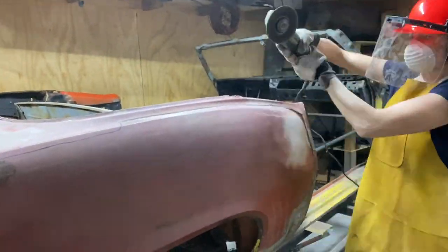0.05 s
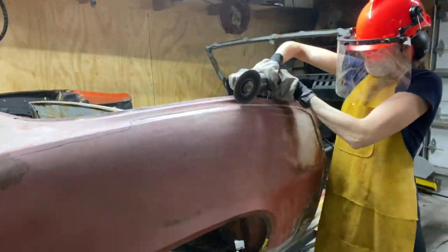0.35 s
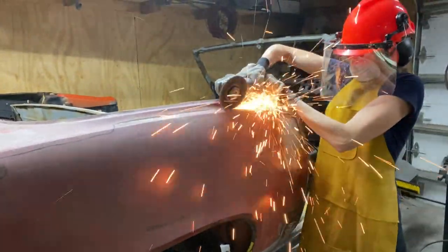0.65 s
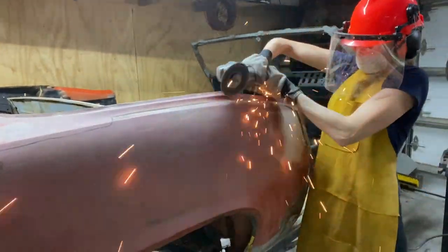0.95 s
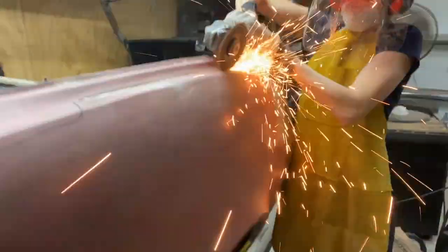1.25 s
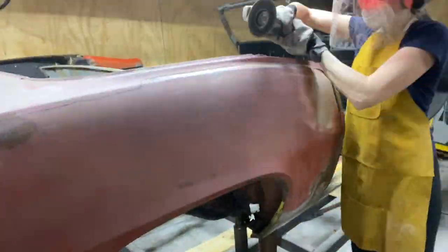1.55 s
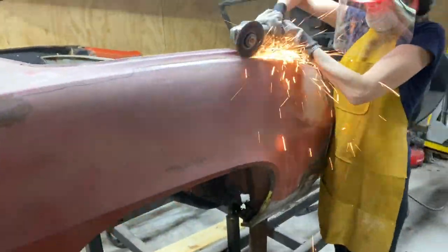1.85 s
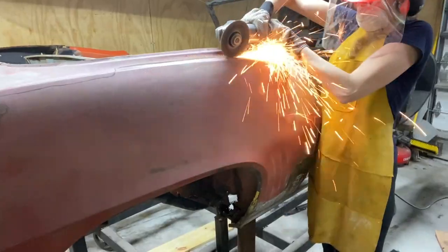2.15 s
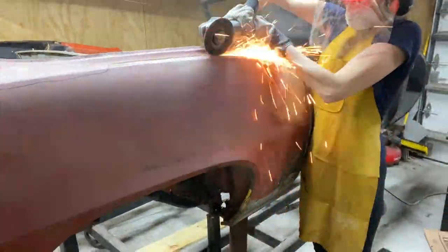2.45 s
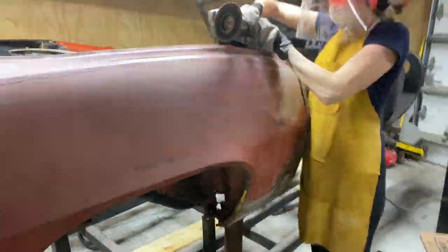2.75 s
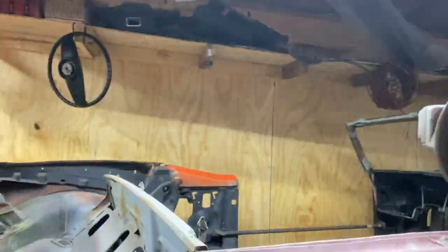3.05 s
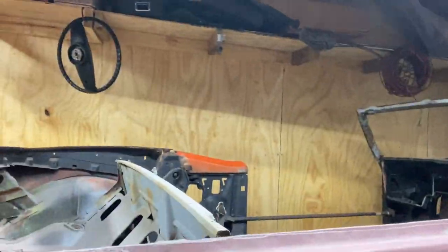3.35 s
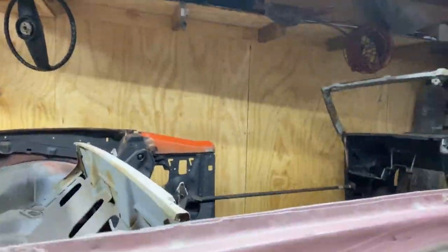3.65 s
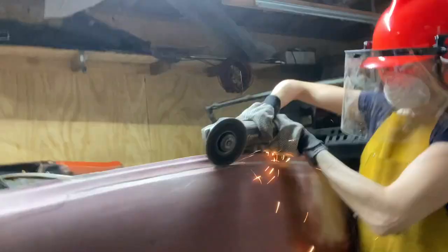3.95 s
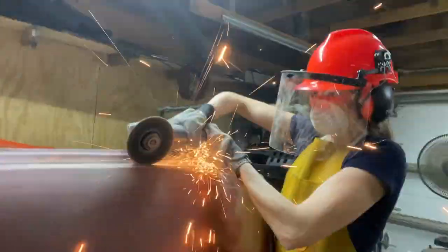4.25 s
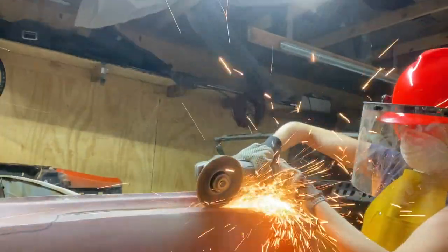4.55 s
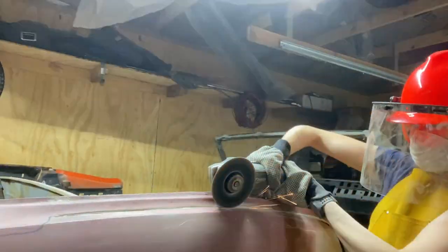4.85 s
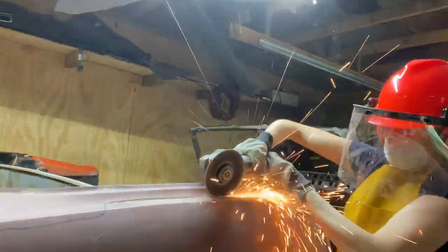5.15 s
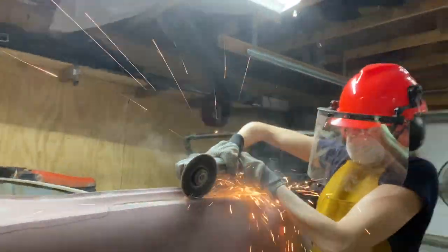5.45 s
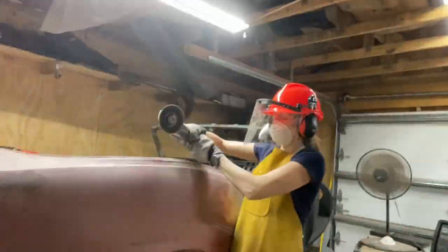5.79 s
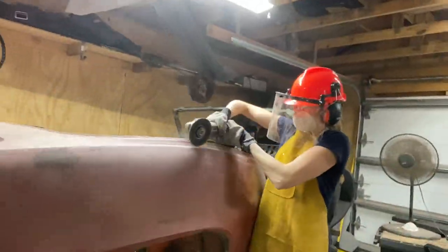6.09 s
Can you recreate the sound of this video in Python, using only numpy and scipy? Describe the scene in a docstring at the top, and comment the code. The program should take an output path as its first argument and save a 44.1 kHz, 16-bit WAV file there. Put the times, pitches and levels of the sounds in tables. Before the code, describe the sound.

An angle grinder is already running, with a high whine and hissing air, a metre or two from a hand-held phone in a garage with a short echo. It cuts into a steel car panel from about 0.4 to 0.9 seconds, briefly from 1.1 to 1.4, and again from 1.7 to 2.6. Each time the motor drops in pitch, grit scrapes, sparks hiss, the panel rings and the disc chatters and squeals; the whine climbs back as it lifts. The tool then spins freely, with faint finger bumps on the phone near 2.9 seconds and a quick cluster of sharper knocks and tiny squeaks around 3.5. Two more cuts follow, from 4.0 to 4.8 and from 4.9 to 5.7, the last slowing the motor most and adding a rough metallic howl. The grinder returns to its free whine until the end, just after 6 seconds.

```python
"""Angle grinder cutting a car wing

An angle grinder makes five cuts in a steel car wing in a garage, a metre or two from a hand-held phone.
Running free, it whines and its fan rushes. When the disc bites, the motor slows, grit scrapes and rings
the panel, sparks hiss, and the disc chatters and squeals in step with the shaft. Fingers bump the phone."""
import sys
import numpy as np
from scipy import signal
from scipy.fft import rfft, irfft
from scipy.io import wavfile

SR = 44100
rng = np.random.default_rng(int(sys.argv[2]) if len(sys.argv) > 2 else 0)


def bounce(signal):
    """Save signal as a 16-bit WAV file at the path given by the first command-line argument."""
    frames = np.transpose(np.atleast_2d(signal))
    limited = np.clip(frames, -1, 1)
    pcm = np.round(limited * 32767).astype(np.int16)
    wavfile.write(sys.argv[1], SR, pcm)


N = 269892
TIME = np.arange(N) / SR
FREQ = np.maximum(np.fft.rfftfreq(N, 1 / SR), 1)
IDLE_HZ = 135.8  # shaft turns per second when running free
CUT_ATTACK_S, ATTACK_S, RELEASE_S = 0.086, 0.016, 0.017  # cuts ease in; digs and squeals start faster
# the disc in the steel: (start [s], end [s], scrape level [dB], spark level [dB])
CUTS = [(0.392, 0.949, -45.5, -39.5), (1.133, 1.427, -51, -46.5), (1.72, 2.642, -43.5, -38.5),
        (3.962, 4.788, -49.5, -37.5), (4.918, 5.716, -50, -35)]


def undb(db):
    """Turn decibels into a gain to multiply by."""
    return 10 ** (np.asarray(db) / 20)


def unit(x):
    """Scale a signal to an average strength (rms) of 1."""
    return x / np.sqrt(np.mean(np.abs(x) ** 2))


def curves(table):
    """Join rows of (time, values...) into one curve per value."""
    times, *columns = np.transpose(table)
    return [np.interp(TIME, times, column) for column in columns]


def since(moment_s):
    """Seconds gone by after a moment; zero before it."""
    return np.maximum(TIME - moment_s, 0)


def contact(start, end, attack_s=ATTACK_S):
    """One touch: rise from 0 to 1, hold, then die away."""
    return np.minimum(since(start) / attack_s, 1) * np.exp(-np.minimum(since(end) / RELEASE_S, 20))


def held(table, column):
    """Hold each row's value from its start to its end; overlapping rows add up."""
    return sum(row[column] * contact(*row[:2]) for row in table)


def sounding(table, column, attack_s=ATTACK_S):
    """Gain over time from a column of decibels; silent between events."""
    return sum(undb(row[column]) * contact(*row[:2], attack_s) for row in table)


def wander(rate):
    """A smooth random curve of strength 1 that changes about `rate` times a second."""
    steps = np.arange(0, TIME[-1] + 1, 1 / (12 * rate))
    slow = signal.sosfilt(signal.butter(3, 1 / 7, output="sos"), rng.standard_normal(len(steps)))
    return unit(np.interp(TIME + 1, steps, slow))


def grains(spread_db, side_db):
    """Noise of many tiny, uneven impacts; more side_db makes the ears less alike."""
    mid, side = rng.standard_normal((2, N)) * undb(spread_db * rng.standard_normal((2, N)))
    return unit(mid + undb(side_db) * side * np.array([[1], [-1]]))


def colour(x, points):
    """Shape bass and treble along (frequency [Hz], level [dB]) points; strength 1."""
    hz, db = np.transpose(points)
    return unit(irfft(rfft(x) * undb(np.interp(np.log(FREQ), np.log(hz), db)), N))


def resonate(x, modes):
    """Ring an object's modes, its natural notes: (pitch [Hz], width [Hz], level [dB])."""
    response = sum(undb(db) / (1 + 1j * (FREQ ** 2 - hz ** 2) / (FREQ * width))
                   for hz, width, db in modes)
    return irfft(rfft(x) * response, N)


def ring_on(x, t60_s):
    """A tail as strong as the sound, different in each ear, that falls 60 dB in t60_s."""
    t = TIME[:SR // 2]
    tail = rng.standard_normal((2, len(t))) * undb(-60 * t / t60_s) * (t > .004)
    tail /= np.sqrt(np.sum(tail ** 2, axis=1, keepdims=True))
    return signal.fftconvolve(x, tail, axes=1)[:, :N]


def pan(db):
    """Left and right gains that make the left louder by db."""
    gains = undb(np.array([db, -db]).reshape(2, -1) / 2)
    return gains / np.sqrt(np.mean(gains ** 2, axis=0))


def tone(angle, order, rough, width_hz, apart, rasp=0):
    """A tone of `order` cycles a turn; uneven contact smears it and grit makes it rasp."""
    smear = rough * (wander(width_hz) + 1j * wander(width_hz))
    if rasp:
        smear += rasp * (wander(220) + 1j * wander(220))
    ear_fading = apart * (0.56 * wander(11.4) + 1j * wander(5.3)) * np.array([[1], [-1]])
    return unit(np.real((1 + smear + ear_fading) * np.exp(1j * order * angle)))


def glides(rows, rough):
    """Short sliding tones with a shaky pitch."""
    out = np.zeros(N)
    for start_s, length_s, start_hz, end_hz, db in rows:
        start, size = int(start_s * SR), int(length_s * SR)
        hz = np.linspace(start_hz, end_hz, size) * (1 + rough * wander(350)[:size])
        wave = np.sin(2 * np.pi * np.cumsum(hz) / SR)
        out[start:start + size] += undb(db) * signal.windows.tukey(size) * wave
    return out


def shaft_speed(load):
    """The shaft slows in every cut and wobbles a little, more so while cutting."""
    # the shaft sags as the disc bites and recovers as it lifts: (time [s], speed [turns/s])
    speeds = [(0.38, 135.8), (0.5, 131.3), (0.58, 125.1), (0.64, 123.6), (0.68, 120.0), (0.76, 122.0),
              (0.82, 117.0), (0.92, 117.0), (0.97, 121.0), (1.02, 131.6), (1.04, 133.3), (1.12, 135.8),
              (1.18, 135.8), (1.22, 132.3), (1.275, 123.2), (1.305, 121.4), (1.38, 128.4), (1.44, 125.9),
              (1.52, 133.9), (1.6, 135.8), (1.72, 135.8), (1.79, 133.5), (1.83, 127.6), (1.94, 124.2),
              (2.02, 118.7), (2.15, 122.2), (2.22, 115.7), (2.28, 116.2), (2.34, 113.1), (2.42, 114.5),
              (2.49, 113.7), (2.59, 115.4), (2.63, 112.7), (2.67, 116.0), (2.75, 131.8), (2.87, 135.8),
              (3.95, 135.8), (4.15, 125.1), (4.28, 123.0), (4.4, 118.2), (4.45, 118.3), (4.61, 116.6),
              (4.75, 116.3), (4.79, 118.2), (4.87, 131.8), (4.93, 134.2), (4.97, 128.9), (5.07, 118.4),
              (5.13, 116.6), (5.21, 111.4), (5.29, 113.2), (5.37, 109.1), (5.43, 108.5), (5.47, 110.2),
              (5.61, 106.0), (5.73, 113.2), (5.775, 127.0), (5.81, 132.5), (5.91, 135.8)]
    speed_hz, = curves(speeds)
    return speed_hz * (1 + (0.00046 + 0.0012 * load) * wander(17.12))


def motor(angle, speed_hz, load, hiss_db, gear_db, whistle_db):
    """The motor whines and whistles, the gear teeth sing and the shaft adds faint tones."""
    # the whine swells: (start [s], end [s], extra level [dB], extra level of its octave [dB])
    swells = [(0.48, 0.8, 4, -4), (1.21, 1.41, 10, -10), (1.76, 1.95, 10, 0), (3.12, 3.53, 7, -2),
              (3.95, 4.78, 1, -9), (4.845, 4.925, 15.5, 3.5), (5.18, 5.55, 3, 9), (5.565, 5.655, 22.5, 1),
              (5.77, 5.82, 11.5, -4)]
    # the ringing of the housing's air vents: (pitch [Hz], width [Hz], relative level [dB])
    vents = [(6710, 100, 11), (6700, 320, -10)]
    # faint running tones, in two matching lists: (pitch [cycles/turn]) and (relative level [dB])
    faint_orders = [3.2, 4.1, 6.2, 15, 20, 30, 49]
    faint_levels = [-15, -18, -13, -11, -24, -30, -8]
    whine = tone(angle, order=10, rough=0.21, width_hz=16, apart=0.39)
    octave = tone(angle, order=20, rough=0.4, width_hz=39, apart=0.38)
    whine += undb(-9.5 + held(swells, column=3)) * octave
    gear = tone(angle, order=39, rough=0.24, width_hz=40, apart=0.35, rasp=0.28)
    whistle = tone(angle, order=50, rough=0.3, width_hz=41, apart=0.51, rasp=0.27)
    # near full speed the whistle meets the vents' own note and turns airy
    in_tune = np.exp(-((speed_hz - IDLE_HZ) / 3) ** 2)
    whistle += undb(-3.5) * in_tune * unit(resonate(grains(spread_db=-1, side_db=-1), vents))
    faint = sum(undb(db) * tone(angle, order, rough=0.84, width_hz=24, apart=1)
                for order, db in zip(faint_orders, faint_levels))
    # cutting strengthens the whine; gears and whistle sing out near full speed
    free = np.exp(-((speed_hz - IDLE_HZ) / 5) ** 2)
    whine *= undb(hiss_db - 27 + 4 * load + held(swells, column=2))
    gear *= undb(gear_db - 15 * (1 - free))
    whistle *= free ** 2 * undb(whistle_db) + load * undb(-67.5)
    return whine + gear + whistle + undb(hiss_db - 24) * faint


def fan(angle, hiss_db):
    """Air torn by the fan and the disc's rim, pulsing a little on every turn."""
    # the air's high hiss and lower rush: (frequency [Hz], relative level [dB])
    hiss_colour = [(3000, -26.5), (4500, -8), (6000, -2.5), (7000, 1.5), (9000, 1), (12000, 1.5),
                   (14000, 4), (15800, 6)]
    rush_colour = [(25, -2.5), (100, -6.5), (220, -6.5), (450, -3.5), (700, -5), (1100, -4.5), (1500, -0.5),
                   (2200, -1.5), (3300, 0.5), (4300, -1), (6000, -4), (9000, -51)]
    hiss = colour(grains(spread_db=1, side_db=-13), hiss_colour) * undb(hiss_db + wander(22))
    rush = colour(grains(spread_db=2.5, side_db=-2), rush_colour)
    rush *= undb(hiss_db - 15.5 + 0.93 * wander(17))
    return (hiss + rush) * (1 + 0.028 * np.cos(angle))


def cutting(angle, speed_hz, load):
    """Grit tears the steel, hardest once a turn, throwing sparks and shaking the panel."""
    # the disc digs in or eases off: (start [s], end [s], extra grit [dB], extra chatter [dB])
    digs = [(0.62, 0.72, 1, 6), (0.778, 0.94, 0.5, 4), (1.19, 1.275, 5, 8.5), (1.93, 2.06, 0.5, 6),
            (2.179, 2.642, -2.5, 2), (2.19, 2.363, 1.5, 4.5), (4.2, 4.6, 0.5, 5.5), (4.71, 4.8, -1, -2),
            (5.16, 5.72, -0.5, -2), (5.525, 5.632, 0.5, 3.5), (5.66, 5.72, -0.5, -1)]
    # grit scraping steel: (frequency [Hz], relative level [dB])
    scrape_colour = [(25, -1), (90, -5.5), (250, -2.5), (600, -1.5), (800, -3), (1100, -4), (1500, -13),
                     (1750, -6), (2200, -7), (2800, 2.5), (3400, -3), (4200, 0), (5000, -1.5), (9000, -14)]
    pressure = undb(held(digs, column=2))
    scrape_gain = pressure * sounding(CUTS, column=2, attack_s=CUT_ATTACK_S)
    spark_gain = pressure * sounding(CUTS, column=3, attack_s=CUT_ATTACK_S)
    chatter_gain = load * undb(-53.5 + held(digs, column=3))
    moved = np.interp(TIME, (3, 4), (0, 1))  # the disc moves to a second spot between 3 and 4 s
    bite = unit(undb(0.68 * np.cos(angle) + 2 * wander(15.6) + wander(330)))
    scrape = colour(bite * grains(spread_db=6, side_db=-0.5), scrape_colour) * scrape_gain
    sparks = spark_hiss(speed_hz, moved) * spark_gain
    chatter = chattering(angle) * chatter_gain
    shake = bite * grains(spread_db=6.5, side_db=-11.5) * (undb(10.5) * scrape_gain + chatter_gain)
    shake += undb(-14) * chatter  # the panel sings out when a chatter tone slides across a mode
    ringing = thin_sheet(bite, scrape_gain) + panel(shake, moved)
    return scrape + sparks + ringing + howling() + bite * chatter + squealing(angle)


def spark_hiss(speed_hz, moved):
    """A flickering spray of hot grit, duller when the disc slows and at the second spot."""
    # the hiss of the sparks: (frequency [Hz], relative level [dB])
    spark_colour = [(3000, -28), (4300, -0.5), (4900, 9), (6200, 4.5), (7500, 9), (9000, 5.5), (10500, 6),
                    (12800, -1.5), (14500, 3.5), (15800, 6.5)]
    treble_hz = 10500
    hiss = colour(grains(spread_db=0, side_db=1), spark_colour)
    treble = irfft(rfft(hiss) / (1 + (treble_hz / FREQ) ** 10), N)
    treble_db = 0.61 * (speed_hz - 115) - 8.5 * moved
    return (hiss - treble + treble * undb(treble_db)) * undb(2.04 * wander(100))


def chattering(angle):
    """The disc rattles in the slot in step with the shaft; higher tones are grittier."""
    # chatter tones, in two matching lists: (pitch [cycles/turn]) and (relative level [dB])
    orders = [12, 18, 20, 28, 30, 40, 50, 60, 70, 80, 90, 100, 110, 120, 130]
    levels = [-13, -21.5, -10, -9.5, -8, -3, -5, -3.5, -1, -2, -5, -2, -1, -2, 3]
    return sum(undb(db) * tone(angle, order, rough=0.53, width_hz=36, apart=1, rasp=order / 110)
               for order, db in zip(orders, levels))


def thin_sheet(bite, scrape_gain):
    """Grit stirs the thin sheet's many close modes, which blur into one ringing tail."""
    # the band those modes fill: (frequency [Hz], relative level [dB])
    band = [(700, -14), (1150, -10), (1450, -7), (2400, -1), (3100, -2), (3900, -22)]
    grit = colour(bite * grains(spread_db=4, side_db=-6), band) * scrape_gain
    return ring_on(grit, t60_s=0.23) * undb(-4)


def panel(shake, moved):
    """The slit steel rings; each mode swells and fades as the contact creeps over it."""
    # the panel's modes: (pitch [Hz], width [Hz], gain at first spot [dB], gain at second spot [dB])
    modes = [(110, 60, -7.5, -6), (660, 23, -5.5, -21), (962.6, 14, 7, 3.5), (1227, 17, -0.5, -15),
             (1450, 56, -1, 1), (1530, 43, 6.5, 5.5), (1917, 57, 4, 1), (2112, 32, 4, -6),
             (2204, 42, -5, 2), (2282, 40, -2, 4), (2494, 34, -5.5, 7), (2695, 51, 3, 5.5),
             (2805, 50, 2.5, -3), (2888, 41, -18, 9.5), (3160, 57, 0.5, 7.5), (3516, 90, -3.5, 5),
             (3795, 97, -4.5, -3), (4940, 63, 0.5, 7), (6030, 240, 1, -11)]
    out = 0
    for hz, width, first_db, second_db in modes:
        level_db = first_db + (second_db - first_db) * moved + 1.35 * wander(6)
        out += resonate(shake, [(hz, width, 0)]) * undb(level_db)
    return out


def squealing(angle):
    """The disc squeals in the slot: rough tones locked to the shaft's speed."""
    # the disc's squeals: (start [s], end [s], pitch [cycles/turn], level [dB])
    squeals = [(0.46, 0.92, 40, -53.5), (0.5, 0.78, 20, -65), (0.623, 0.86, 50, -44),
               (0.78, 0.904, 20, -45.5), (0.788, 0.92, 30, -49), (1.19, 1.273, 50, -48),
               (1.193, 1.233, 45, -44), (1.2, 1.226, 40, -46), (1.22, 1.33, 20, -51),
               (1.239, 1.28, 30, -42.5), (1.315, 1.334, 30, -52), (1.317, 1.406, 15, -53.5),
               (1.847, 2.196, 50, -43.5), (1.955, 2.303, 20, -56), (2.17, 2.62, 30, -51),
               (2.306, 2.65, 20, -48.5), (2.498, 2.624, 20, -50), (2.514, 2.61, 50, -50.5),
               (4.062, 4.136, 50, -43), (4.127, 4.335, 40, -41.5), (4.214, 4.307, 40, -40.5),
               (4.217, 4.548, 50, -54), (4.38, 4.563, 40, -39.5), (4.572, 4.718, 40, -52),
               (4.352, 4.705, 60, -46.5), (4.098, 4.6, 90, -53), (4.993, 5.04, 40, -38),
               (5.063, 5.64, 40, -45.5), (5.553, 5.628, 40, -51.5), (5.158, 5.33, 50, -45.5),
               (5.483, 5.62, 50, -42), (5.15, 5.69, 80, -45), (5.558, 5.632, 30, -48.5),
               (5.54, 5.648, 20, -43), (5.687, 5.718, 20, -42), (5.7, 5.725, 40, -47)]
    out = 0
    for order in sorted({row[2] for row in squeals}):
        gain = sounding([row for row in squeals if row[2] == order], column=3)
        out += gain * tone(angle, order, rough=0.31, width_hz=40, apart=0.28, rasp=0.3)
    return out * pan(8.6)


def howling():
    """Grit rings the slot's edges; each howl mixes a steady note with a rasp at the same pitch."""
    # the edges howl: (start [s], end [s], pitch [Hz], width [Hz], level [dB], purity [0-1])
    howls = [(0.79, 0.948, 2120, 40, -47.5, 0.54), (2.18, 2.645, 2082, 27, -49, 0.4),
             (5.162, 5.69, 2075, 30, -46.5, 0.75), (5.537, 5.725, 2190, 220, -46, 0.3),
             (5.172, 5.625, 4970, 300, -43.5, 0.04), (5.46, 5.632, 5400, 254, -47, 0.2)]
    grit = grains(spread_db=6, side_db=-9)
    out = 0
    for start, end, hz, width, db, purity in howls:
        note = tone(2 * np.pi * hz * TIME, order=1, rough=0.2, width_hz=25, apart=0.14)
        rasp = unit(resonate(grit, [(hz, width, 0)]))
        out += undb(db) * contact(start, end) * (np.sqrt(purity) * note + np.sqrt(1 - purity) * rasp)
    return out


def handling():
    """A finger sticks and slips on the phone; each slip knocks and rubs, and fast slips squeak."""
    # finger bumps: (time [s], relative level [dB])
    bumps = [(1.111, -47), (2.838, -42.5), (2.881, -46), (2.899, -49), (2.936, -41.5), (3.469, -32),
             (3.483, -29), (3.491, -22.5), (3.501, -25), (3.513, -25.5), (3.522, -27), (3.526, -32),
             (3.534, -26.5), (3.542, -46), (3.559, -35), (3.574, -43)]
    # the ringing of the phone's case: (pitch [Hz], width [Hz], relative level [dB])
    case_modes = [(410, 90, -6.5), (510, 152, 4.5), (685, 100, -1), (1080, 780, -11.5), (2000, 3500, -14.5),
                  (6660, 740, -14)]
    # finger squeaks: (time [s], length [s], start pitch [Hz], end pitch [Hz], level [dB])
    squeaks = [(3.446, 0.036, 2150, 3280, -45), (3.455, 0.016, 1260, 1650, -44),
               (3.485, 0.016, 1670, 1940, -37.5), (3.487, 0.017, 6900, 7570, -33),
               (3.499, 0.009, 7400, 6200, -27), (3.51, 0.011, 7260, 5860, -33),
               (3.612, 0.016, 7100, 6500, -43), (5.83, 0.03, 4503, 2786, -50.5)]
    knocks, rub = np.zeros((2, N))
    for start_s, db in bumps:
        start = int(start_s * SR)
        knocks[start] += undb(db)
        rub[start:] += undb(db) * np.exp(-TIME[:N - start] / 0.0088)
    # soft skin rounds each knock; the small case carries no bass
    knocks = signal.sosfilt(signal.butter(2, 1800, fs=SR, output="sos"), knocks)
    case = resonate(knocks + 0.06 * rub * grains(spread_db=4.5, side_db=-8), case_modes)
    case = signal.sosfilt(signal.butter(4, 275, "high", fs=SR, output="sos"), case)
    return (undb(26.5) * case + glides(squeaks, rough=0.018)) * pan(3)


def falling_zips():
    """Faint tones slide down as the last two cuts end."""
    # the zips: (time [s], length [s], start pitch [Hz], end pitch [Hz])
    zips = [(4.759, 0.071, 984, 68.9), (5.639, 0.04, 910, 100), (5.656, 0.059, 1096, 414)]
    level_db = -55
    return glides([(*row, level_db) for row in zips], rough=0.1)


def garage(x):
    """Close plywood walls add a short echo."""
    echo_gain = undb(-5.5)
    return (x + echo_gain * ring_on(x, t60_s=0.076)) / np.sqrt(1 + echo_gain ** 2)


def microphones(x, pan_db):
    """The microphone nearer the tool hears it louder and a moment sooner."""
    lead_s = 6e-6 * pan_db
    fine = signal.resample_poly(x, 4, 1, axis=1)  # finer time steps allow tiny delays
    fine_time = np.arange(4 * N) / (4 * SR)
    left = np.interp(TIME + lead_s, fine_time, fine[0])
    right = np.interp(TIME - lead_s, fine_time, fine[1])
    return np.array([left, right]) * pan(pan_db)


def scene():
    """One turning shaft drives the whine, chatter and squeals; the hiss follows its speed."""
    # how the free-running tool is heard as it and the phone move:
    # (time [s], hiss [dB], gears [dB], whistle [dB], left minus right [dB])
    tool_levels = [(0.1, -38, -51.5, -49, 0.5), (1.1, -37.5, -50, -59, 1), (1.55, -39, -50.5, -56, 0.5),
                   (2.88, -37, -48, -48.5, 1), (2.98, -32, -68, -41, -0.5), (3.12, -33, -76, -41, -1.5),
                   (3.22, -32.5, -76, -51, -2), (3.58, -35, -73, -58, -2), (3.74, -35, -80, -49, -1),
                   (3.81, -37.5, -57, -49, 1), (4.88, -32, -65, -71, 2), (5.8, -38.5, -64, -49, 1.5),
                   (5.97, -40.5, -61, -49.5, 2), (6.1, -39, -58, -58, 1.5)]
    hiss_db, gear_db, whistle_db, pan_db = curves(tool_levels)
    load = sum(contact(start, end, CUT_ATTACK_S) for start, end, *_ in CUTS)  # 0 free, 1 cutting
    speed_hz = shaft_speed(load)
    angle = 2 * np.pi * np.cumsum(speed_hz) / SR
    # the hiss is quieter at low speed and dips briefly after each cut
    hiss_db_per_hz, dip_db, dip_s = 0.11, -4.5, 0.096
    dip = sum((TIME > end) * np.exp(-since(end) / dip_s) for _, end, *_ in CUTS) * (1 - load)
    hiss_db += hiss_db_per_hz * (speed_hz - IDLE_HZ) + dip_db * dip
    zips = falling_zips()
    # the walls only make the steady motor tones fade from ear to ear; the noisy work leaves a tail
    tones = motor(angle, speed_hz, load, hiss_db, gear_db, whistle_db)
    work = garage(fan(angle, hiss_db) + cutting(angle, speed_hz, load) + zips)
    return microphones(tones + work, pan_db) + handling()


def record(dry):
    """The phone cuts off the highest treble steeply."""
    top_hz = 15900
    return signal.sosfilt(signal.ellip(12, .1, 85, top_hz, fs=SR, output="sos"), dry)


dry = scene()
out = record(dry)
bounce(out)
```